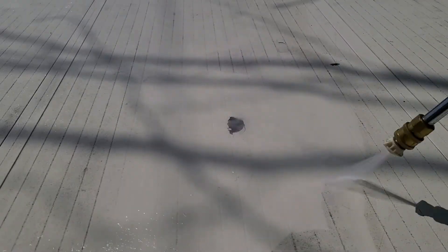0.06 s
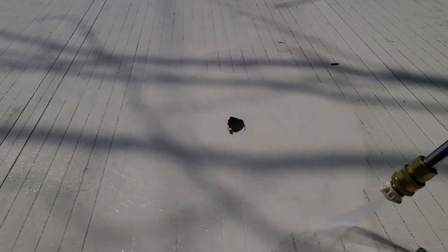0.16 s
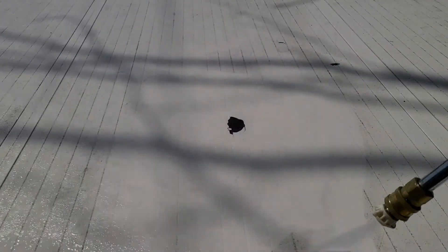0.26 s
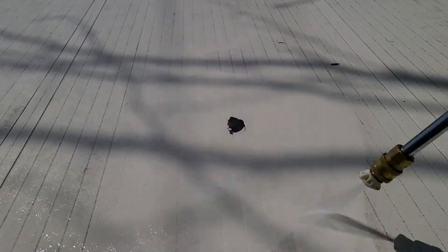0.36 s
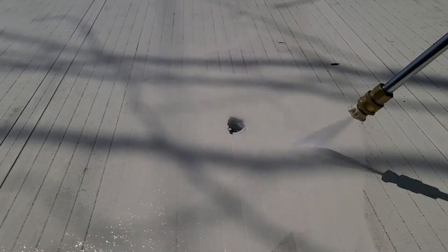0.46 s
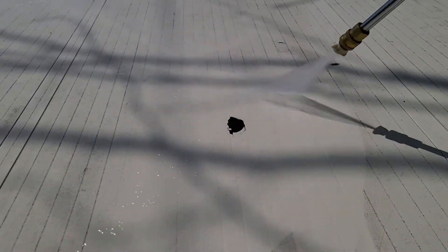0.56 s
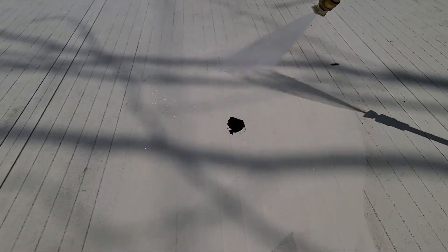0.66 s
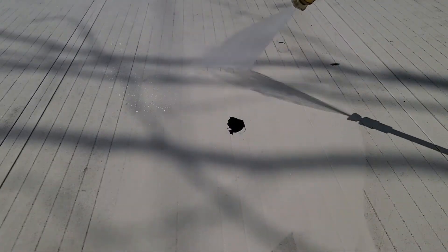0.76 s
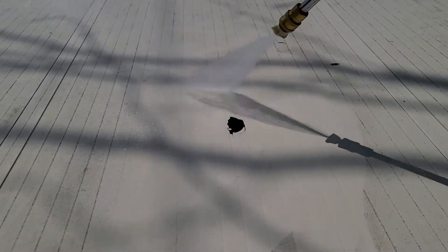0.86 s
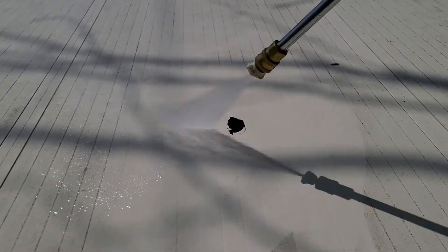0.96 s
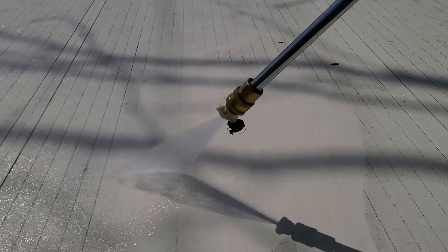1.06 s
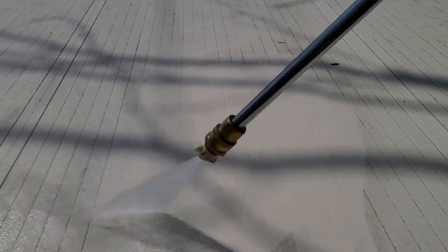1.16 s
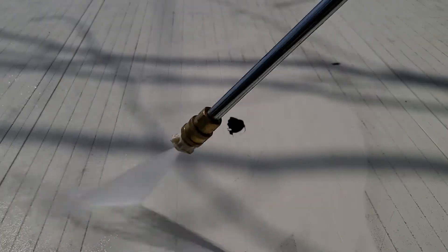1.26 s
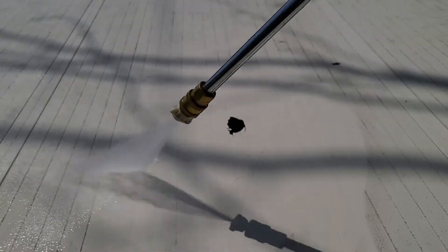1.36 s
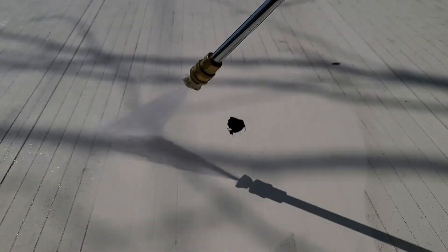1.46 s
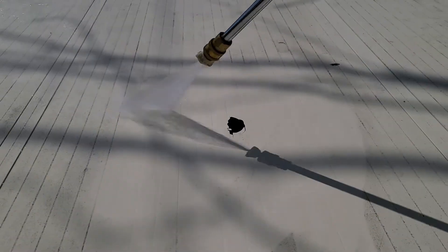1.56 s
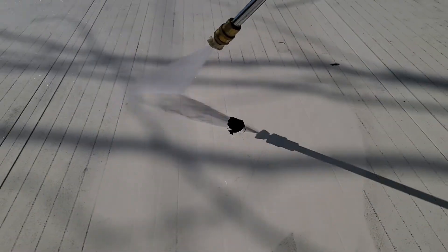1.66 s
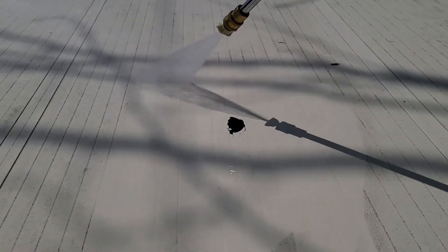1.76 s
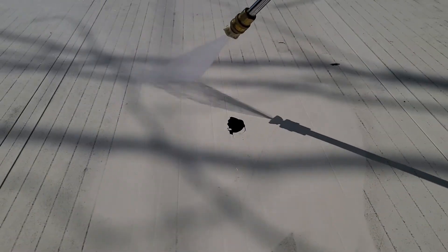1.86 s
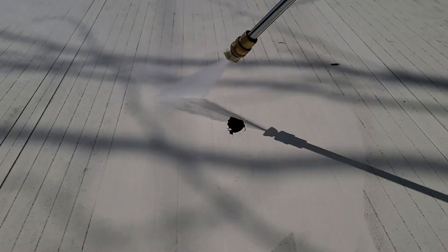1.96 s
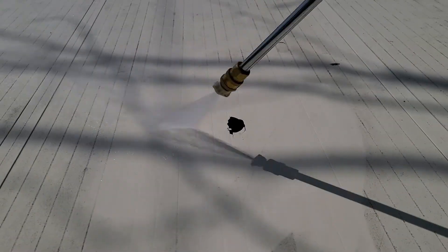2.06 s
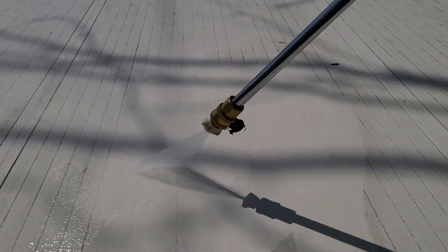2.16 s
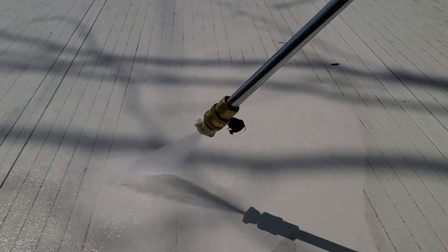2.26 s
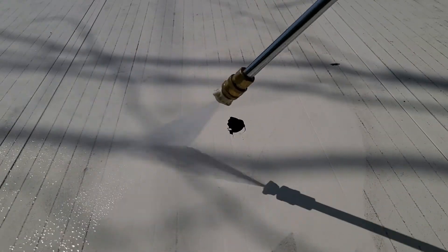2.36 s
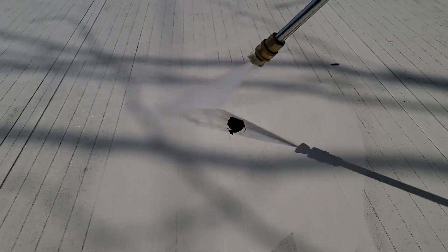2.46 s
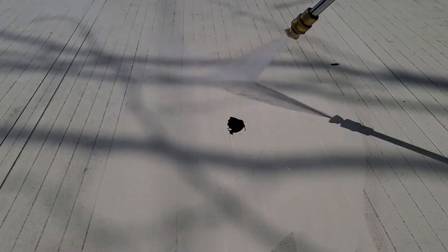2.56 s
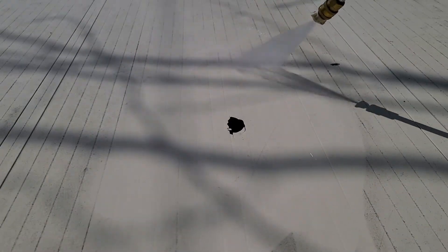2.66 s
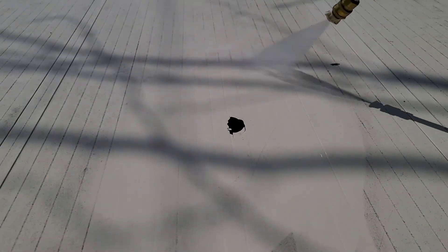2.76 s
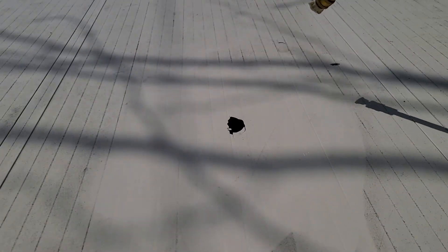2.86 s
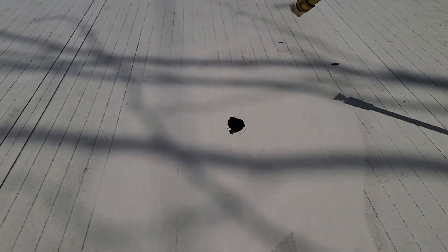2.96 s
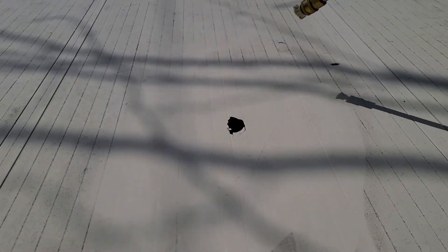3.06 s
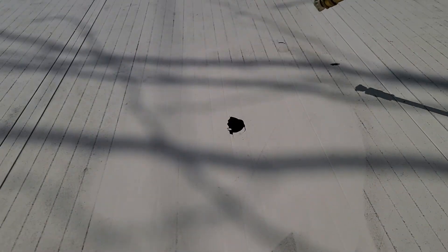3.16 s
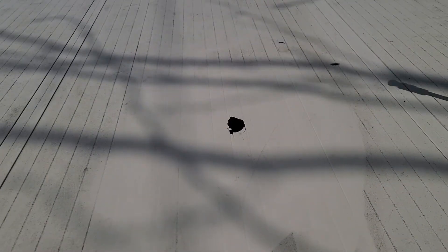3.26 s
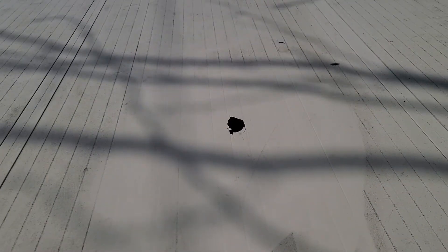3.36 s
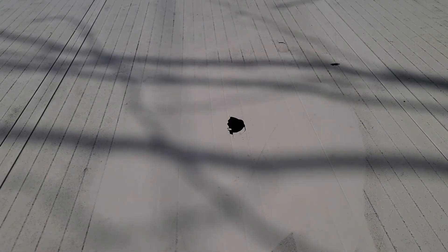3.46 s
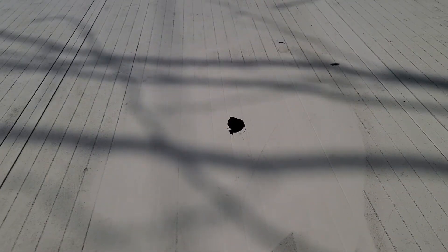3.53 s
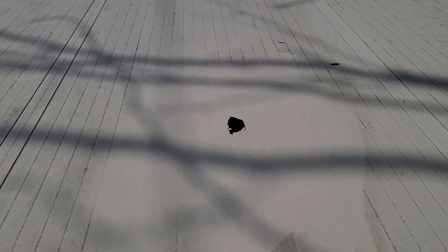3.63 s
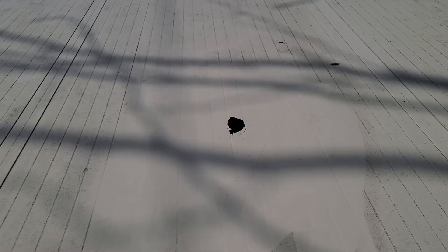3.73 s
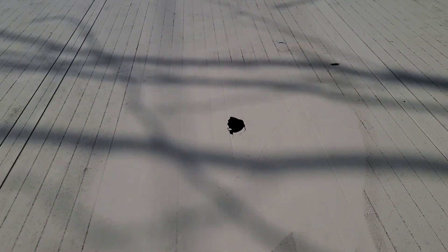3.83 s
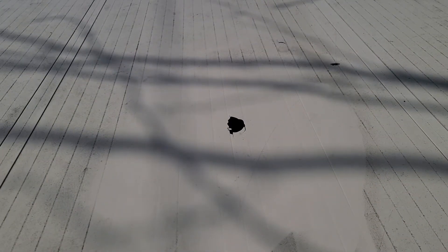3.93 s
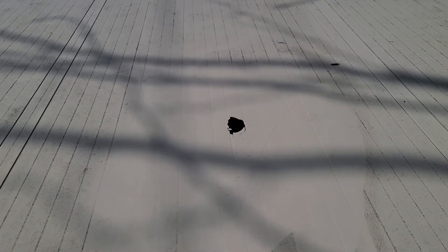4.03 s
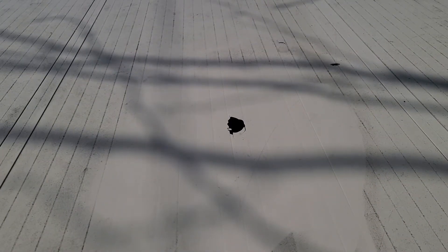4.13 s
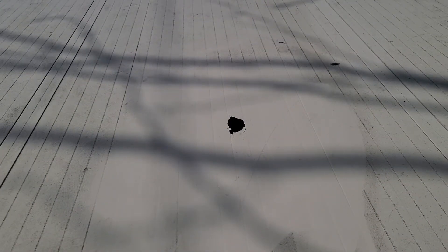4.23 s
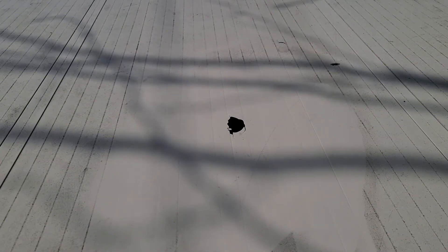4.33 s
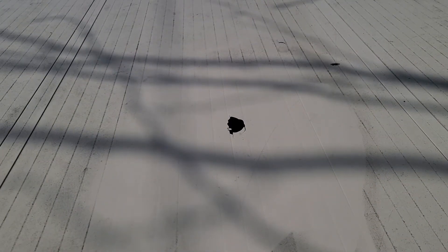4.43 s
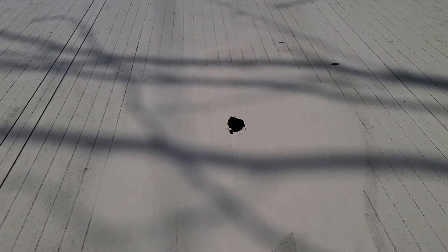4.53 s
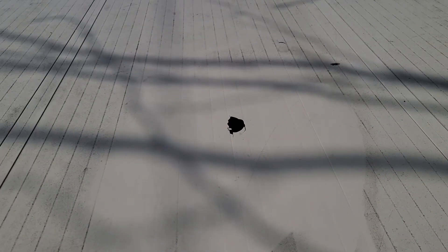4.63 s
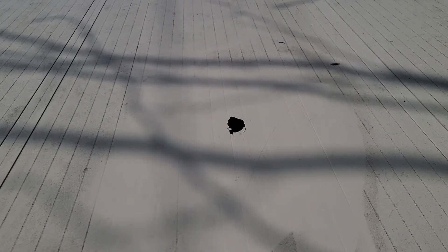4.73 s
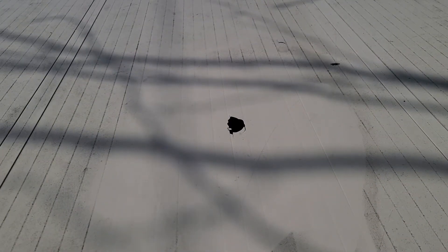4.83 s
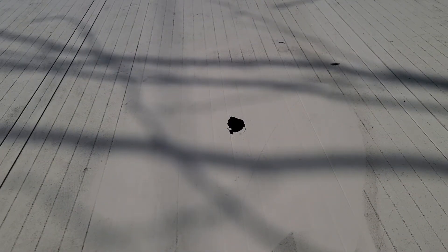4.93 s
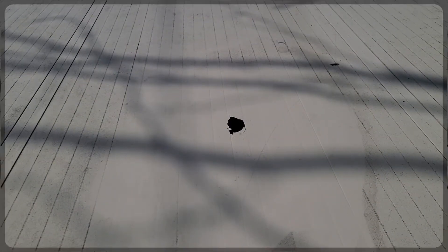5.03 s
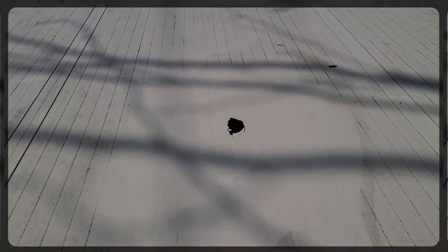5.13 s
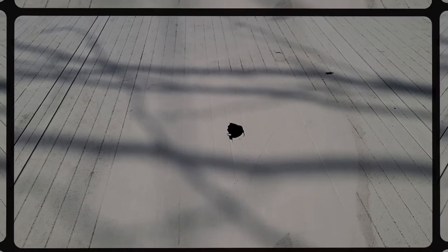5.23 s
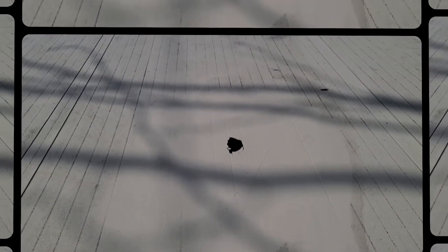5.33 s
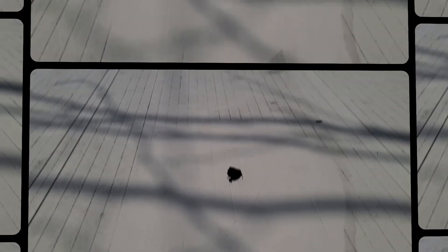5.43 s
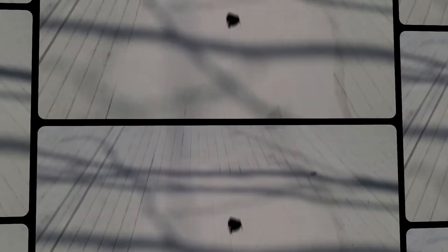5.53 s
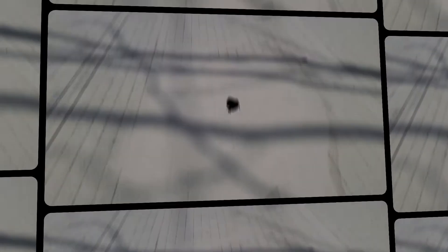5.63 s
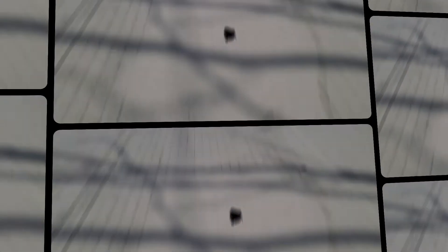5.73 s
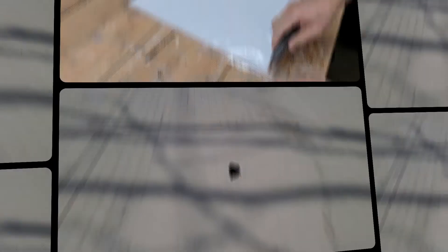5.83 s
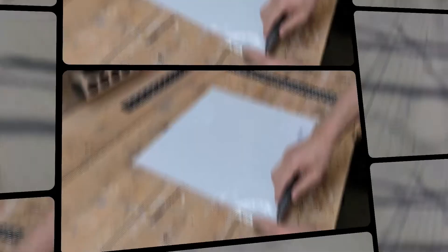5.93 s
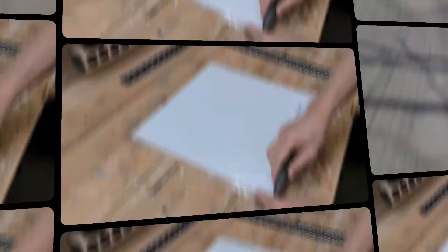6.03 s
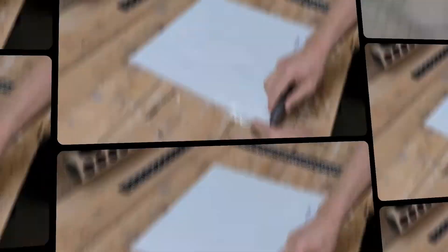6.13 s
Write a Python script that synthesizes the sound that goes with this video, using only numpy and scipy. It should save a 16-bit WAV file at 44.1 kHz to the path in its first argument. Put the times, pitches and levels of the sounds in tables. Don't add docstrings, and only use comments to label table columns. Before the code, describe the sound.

Close stereo pickup of a broad, gritty water spray drumming on roofing, moving from centre to left and back. It ends abruptly, uncovering the much quieter pump engine on the right: rapid exhaust puffs, metallic pipe ring, casing clatter and light valve ticks. The engine speeds up, hunts and steadies over a low outdoor rumble, then dims as a small contact clatter and dull thud sound nearby.

```python
import sys
import numpy as np
from scipy import signal
from scipy.fft import rfft, irfft, next_fast_len
from scipy.io import wavfile
from scipy.ndimage import uniform_filter1d

SR = 44100
rng = np.random.default_rng(int(sys.argv[2]) if len(sys.argv) > 2 else 0)


def to_wav(sig):
    pcm = np.clip(np.atleast_2d(sig), -1, 1) * 32767
    pcm = np.round(pcm).astype(np.int16)
    wavfile.write(sys.argv[1], SR, pcm.T)


def natural_amplitude(level_db):
    exponent = np.asarray(level_db, float) / 20
    return 10 ** exponent


N = 272979
PAD = next_fast_len(N + 4096)

# [f/Hz, density/dB per Hz]
SPRAY_SPECTRUM = [(150, -5), (330, -8), (700, -10), (1200, -7), (2000, -8), (3200, -4.5), (4200, -8),
                  (6300, -5.5), (7400, -17.5), (8200, -19), (10500, -12), (12500, -5.5), (13700, -6),
                  (15800, -6)]
# [t/s, nozzle nearness/dB, impact force/dB]
WAND_MOTION = [(0, 2, -2), (.14, 3, -5.5), (.25, 2, -4), (.36, 0.3, -6), (.47, -2.5, -0.5), (.66, -4.5, 1),
               (.88, -0.8, 2), (1.12, 2.5, 2.5), (1.31, 0.7, 0.6), (1.64, 0, 2), (1.82, -1, 4.5),
               (2.1, 3.5, -1.5), (2.49, -1, 2.8), (2.56, 0, 4), (2.74, -1.5, 2)]
# [f/Hz, share of nearness, share of force]
SPRAY_RESPONSE = [(400, -0.25, 0.43), (800, -0.25, 0.55), (2000, -0.037, 0.86), (5670, 0.68, 0),
                  (12500, 0.91, 0)]
# [t/s, left port lag/ms]
IMPACT_LAG = [
    (0, 0.081),
    (.5, .016),
    (1.1, -.16),
    (1.3, -0.21),
    (1.6, -.135),
    (2.1, -.12),
    (2.3, -.15),
    (2.7, -0.0031),
]
# [f/Hz, share common to both ports, left-right level/dB ahead, slope/dB per ms of lead]
JET_IMAGE = [(300, 0.84, -2, -6), (1300, 0.38, -2.5, 5), (2830, 0.75, 0.7, 5), (4000, 0.85, -2.2, 15.5),
             (5630, 0.59, 1.7, 13), (8010, 0.52, 10.5, 5), (9300, 0.046, -6, 6), (12100, 0.033, 1.5, 17)]
# [t/s, level/dB, centre f/Hz]
ROOF_DRUMMING = [
    (.037, -37.5, 368),
    (.054, -43.5, 670),
    (.058, -46.5, 1120),
    (.1, -45.5, 400),
    (.387, -47.5, 470),
    (.428, -41, 745),
    (.43, -47, 1200),
    (.49, -41, 323),
    (.528, -43, 400),
]
# [t/s, rate/cycles per s]
ENGINE_SPEED = [(0, 28.72), (2.79, 28.72), (2.85, 30.8), (2.94, 33.5), (3.1, 31.3), (3.2, 30.3),
                (3.45, 30.2), (3.62, 29.7), (3.78, 31.9), (3.92, 31.9), (4.2, 30.7), (4.4, 31.3),
                (4.62, 31.4), (4.85, 31.05), (5.45, 31.55), (5.62, 30.9), (5.85, 31.4), (6.19, 31.2)]
# [t/s, level/dB re full]
THROTTLE = [
    (0, 0),
    (2.86, 0),
    (2.97, -7),
    (3.14, -7.5),
    (3.4, -4.7),
    (3.71, -2.2),
    (3.95, -6),
    (4.34, -4.2),
    (5.1, -4.2),
]
ENGINE_CYCLE = [(-.0075, .0007, 0, -.65, 1.), (-.0033, .0009, .75, -.1, 1.), (-.0008, .0008, 1.45, 1.2, .5),
                (-.0004, .00022, .55, .15, 1.), (.00075, .0012, -.65, -1.7, 1.2),
                (.0032, .0016, .35, -.85, 1.), (.0047, .0006, .35, .45, 1.), (.0088, .0007, -.4, -.85, 1.),
                (.0105, .0015, 1.5, 1.0, .6), (.0148, .0018, .05, -1.0, 1.), (.0195, .0016, .25, -1.05, 1.),
                (.0239, .0018, .6, 0, 1.)]
STARVED_SHARE = [0, 0, .5, .5, 1, 0, 0, 0, 0, 0, -3.2, 0]
# [f/Hz, t60/s, level/dB idling, level/dB loaded]
PIPE_MODES = [(281.8, 0.27, -22.5, -29.5), (307.5, 0.33, -67, -16.5), (343.5, 0.37, -50, -29),
              (407.4, 0.14, -18, -12.5), (488, 0.1, -20, -60), (568.7, 0.15, -26.5, -18),
              (653, 0.28, -28, -35.5), (778, 0.32, -33, -25), (843, 0.16, -41, -22)]
PIPE_NULL = 250, 14, .4
# [f/Hz, density/dB per Hz]
CLATTER_SPECTRUM = [(150, -24), (300, -16), (500, -9), (900, -11), (1300, -7), (2200, -14), (3300, -13.5),
                    (4800, -20.5), (7000, -24.5), (8700, -35), (10300, -30), (12000, -23.5), (13200, -23.5),
                    (15800, -24)]
# [f/Hz, width/Hz, level/dB]
SHROUD_MODES = [(2108, 33, -13.5), (2353, 36, -17.5), (2550, 6.7, -19), (2840, 14, -27), (2900, 21, -19)]
# [f/Hz, share common to both ports]
CASING_LIKENESS = [(300, 0.99), (1000, 0.98), (3000, 0.68), (7000, 0.081), (15000, 0.098)]
# [f/Hz, left-right level/dB]
CASING_BALANCE = [(300, -3.5), (2500, -1), (4800, -3.5), (7200, 12.5), (9000, 14), (12000, -1), (15500, -1)]
# [centre t/s, length/s, tick level/dB, hiss lift/dB]
VALVE_SPELLS = [
    (2.79, 0.062, -59, -2),
    (3.3, 0.27, -67, 1.5),
    (3.7, 0.075, -65, 3),
    (4.105, 0.19, -66.5, 0.7),
    (5.02, 0.13, -60.5, 3.5),
]
# [f/Hz, width/Hz, level/dB]
TICK_MODES = [(11900, 1000, 0), (14500, 1500, -7), (9700, 700, -10), (5600, 900, -9)]
# [t/s, peak level/dB, ring f/Hz]
KNOCKS = [
    (5.802, -53, 1000),
    (5.805, -50, 1700),
    (5.809, -48, 2500),
    (5.812, -50, 1350),
    (5.817, -49, 2000),
    (6.154, -43, 610),
    (6.155, -52, 1100),
    (6.150, -46, 340),
    (6.166, -48, 260),
    (6.174, -46, 430),
]

TRIGGER_S, COLLAPSE_S = 2.751, .013
DRUM_S, DRUM_WIDTH = 0.022, 0.53
ENGINE_LAG_SAMPLES = 17
EXHAUST_DB, IDLE_BELOW_DB, OVERRUN = -39, -4.5, 1.2
PIPE_DAMPED_DB = 8
CLATTER_DB, CLATTER_FOLLOWS, AIR_DB, AIR_FOLLOWS = -56.5, 0.31, -65.5, 0.55
TICK_FLOOR_DB = -66
SETTLE_DB, SETTLE_S = -3.5, 0.88
RISE_DB, RISE_S = -3, .15
FADE_FROM_S, FADE_DB_PER_S, CASING_FADES = 5.26, -7.5, 0.72
KNOCK_CYCLES = 36
CUTOFF_HZ = 15900


def rms_one(x):
    return x / np.sqrt(np.mean(x ** 2) + 1e-20)


def in_time(rows):
    s, *columns = np.transpose(rows)
    return [np.interp(np.arange(N) / SR, s, c) for c in columns]


def at_hz(rows, hz, axis=1):
    table = np.array(rows)
    return np.interp(np.log(hz), np.log(table[:, 0]), table[:, axis])


def drift(rate_hz):
    r = np.exp(-80 * np.pi * rate_hz / SR)
    slow = signal.lfilter([1], [1, -2 * r, r * r], rng.standard_normal(N // 40 + 2002))[2000:]
    return np.interp(np.arange(N) / 40, np.arange(len(slow)), rms_one(slow))


def resonance(x, hz, width_hz):
    r = np.exp(-np.pi * width_hz / SR)
    poles = [1, -2 * r * np.cos(2 * np.pi * hz / SR), r * r]
    return signal.lfilter([(1 - r * r) / 2, 0, (r * r - 1) / 2], poles, x)


def passed(x, hz, kind, order=2):
    return signal.sosfilt(signal.butter(order, hz, kind, fs=SR, output="sos"), x)


def bands(spectrum, white):
    hz = np.arange(1, PAD // 2 + 2) * SR / PAD
    coloured = rfft(white) * natural_amplitude(at_hz(spectrum, hz)) * (hz > 150)
    coloured = coloured / np.sqrt(np.mean(np.abs(coloured) ** 2) / PAD)
    for centre_hz in 250 * 2 ** np.arange(0, 6.6, .5):
        away = np.clip(2 * np.log2(hz / centre_hz), -1, 1)
        yield centre_hz, irfft(coloured * np.cos(away * np.pi / 2) ** 2, PAD)[:, :N]


def late(x, lag_samples):
    fine = signal.resample_poly(x, 4, 1)
    return np.interp((np.arange(N) - lag_samples) * 4, np.arange(len(fine)), fine)


def jet():
    (near_db, force_db), (lag_ms,) = in_time(WAND_MOTION), in_time(IMPACT_LAG)
    white = rng.standard_normal((3, PAD))
    drop_sizes = natural_amplitude(3.5 * rng.exponential(1, PAD) - 16.0) * rng.choice([-1, 1], PAD)
    white[0] += (rng.random(PAD) < 900 / SR) * drop_sizes
    direct, diffuse = np.zeros((2, N)), np.zeros((2, N))
    flutter_db = .5 * drift(8.6) + .5 * drift(90)
    for hz, (common, *own) in bands(SPRAY_SPECTRUM, white):
        change_db = at_hz(SPRAY_RESPONSE, hz) * near_db + at_hz(SPRAY_RESPONSE, hz, axis=2) * force_db
        pan_db = at_hz(JET_IMAGE, hz, axis=2) - at_hz(JET_IMAGE, hz, axis=3) * lag_ms
        band_db = change_db + flutter_db + 0.71 * drift(15.0)
        gain = natural_amplitude(band_db + pan_db / 2 * np.array([[1], [-1]]))
        share = np.clip(at_hz(JET_IMAGE, hz), 0, 1)
        direct += gain * np.sqrt(share) * common
        diffuse += gain * np.sqrt(1 - share) * np.array(own)
    direct[0] = late(direct[0], lag_ms * SR / 1000)
    after_s = np.maximum(np.arange(N) / SR - TRIGGER_S, 0)
    spray = (direct + diffuse) * natural_amplitude(-60 * after_s / COLLAPSE_S)
    echo = passed(diffuse, 5000, "low") * natural_amplitude(-14 - 60 * after_s / .5) * (after_s > 0)
    return natural_amplitude(-32.5) * (spray + echo)


def drumming():
    out, span = np.zeros((2, N)), SR * 7 // 10
    t = np.arange(span) / SR
    for s, db, hz in ROOF_DRUMMING:
        common, left, right = rng.standard_normal((3, span))
        noise = common + 0.54 * np.array([left, right])
        for _ in range(2):
            noise = resonance(noise, hz, DRUM_WIDTH * hz)
        out[:, :span] += natural_amplitude(db) * np.exp(-.5 * ((t - s) / DRUM_S) ** 2) * rms_one(noise)
    return out


def strokes(per_s):
    turns = np.cumsum(per_s * (1 + .001 * drift(10))) / SR + .3
    return np.r_[-round(.3 * SR / per_s[0]), np.flatnonzero(np.diff(np.floor(turns)) > 0)]


def train(at, sizes, delay_s=0.):
    out = np.zeros(N + SR)
    out[at + round(delay_s * SR)] = sizes
    return out[:N]


def exhaust(at, level_db, load):
    chance = rng.standard_normal((len(at), len(ENGINE_CYCLE) + 1))
    t = np.arange(-300, 301) / SR
    wave, load = np.zeros(N), load[np.maximum(at, 0)]
    pull, shut = np.maximum(load, 0), np.minimum(load, 0)
    for k, (s, width_s, idling, loaded, spread_db) in enumerate(ENGINE_CYCLE):
        starved = shut * idling * STARVED_SHARE[k]
        sizes = (idling + (loaded - idling) * pull + starved) * natural_amplitude(spread_db * chance[:, k])
        wave += signal.fftconvolve(train(at, sizes, s), np.exp(-.5 * (t / width_s) ** 2), "same")
    for hz, t60_s, idling_db, loaded_db in PIPE_MODES:
        r, w = natural_amplitude(-60 / (t60_s * SR)), 2 * np.pi * hz / SR
        blow_db = idling_db + (loaded_db - idling_db) * pull + PIPE_DAMPED_DB * shut + chance[:, -1]
        blows = passed(train(at, natural_amplitude(blow_db), -.002) + 1e-18, 1660, "low")
        wave += signal.lfilter([0, np.sin(w)], [1, -2 * r * np.cos(w), r * r], blows)
    null_hz, null_width_hz, null_share = PIPE_NULL
    wave = wave - null_share * resonance(wave, null_hz, null_width_hz)
    wave = passed(wave - uniform_filter1d(wave, 4200), 8, "high", order=1)
    wave = natural_amplitude(level_db - 1.5) * wave / np.sqrt(uniform_filter1d(wave ** 2, 8000))
    return np.array([late(wave, ENGINE_LAG_SAMPLES) * natural_amplitude(0.5), wave * natural_amplitude(2.46)])


def clatter(at, level_db, hiss_db):
    blows = train(at, 1.0, 0.0083) + train(at, 0.16, 0.02)
    swell = signal.lfilter([1], [1, -np.exp(-1 / (0.0062 * SR))], blows)
    direct, diffuse = np.zeros((2, N)), np.zeros((2, N))
    together = drift(2.8)
    for hz, (common, *own) in bands(CLATTER_SPECTRUM, rng.standard_normal((3, PAD))):
        share = np.clip(at_hz(CASING_LIKENESS, hz), 0, 1)
        airy = np.clip(np.log2(hz / 3500), 0, 1)
        db = level_db + airy * (hiss_db - level_db + 5.0) + .5 * together + 1.0 * drift(30)
        gain = natural_amplitude(db + 8 + at_hz(CASING_BALANCE, hz) / 2 * np.array([[1], [-1]]))
        direct += gain * np.sqrt(share) * common
        diffuse += gain * np.sqrt(1 - share) * np.array(own)
    white = rng.standard_normal(N)
    for hz, width_hz, db in SHROUD_MODES:
        ring = rms_one(resonance(white, hz, width_hz))
        direct += natural_amplitude(level_db + 8.5 + db + 0.62 * drift(13.0)) * ring
    direct[0] = late(direct[0], ENGINE_LAG_SAMPLES)
    return direct * (0.79 + 0.85 * swell) + diffuse


def valve_ticks(at, level_db):
    chance = rng.standard_normal((len(at), 4))
    hits = train(at, natural_amplitude(1.5 * chance[:, 0]), .0088)
    hits += train(at, natural_amplitude(3 * chance[:, 1] - 7), .0135)
    hits += train(at, natural_amplitude(3 * chance[:, 2] - 5), .018)
    hits += train(at, natural_amplitude(3 * chance[:, 3] - 8), .026)
    decay = signal.lfilter([1], [1, -np.exp(-1 / (.002 * SR))], hits + 1e-18)
    bursts = decay * rng.standard_normal((4, N))
    tick = np.zeros(N)
    for burst, (hz, width_hz, db) in zip(bursts, TICK_MODES):
        tick += natural_amplitude(db) * resonance(resonance(burst, hz, width_hz), hz, width_hz)
    tick = natural_amplitude(level_db) * rms_one(tick)
    return np.array([late(tick, ENGINE_LAG_SAMPLES) * natural_amplitude(-13.0), tick])


def spells():
    t = np.arange(N) / SR
    tick, lift_db = natural_amplitude(TICK_FLOOR_DB), 0
    for s, length_s, tick_db, hiss_db in VALVE_SPELLS:
        bell = np.exp(-.5 * ((t - s) / length_s) ** 2)
        tick = tick + natural_amplitude(tick_db) * bell
        lift_db = lift_db + hiss_db * bell
    return 20 * np.log10(tick), lift_db


def knocks():
    out = np.zeros(N)
    for s, db, hz in KNOCKS:
        start = round(s * SR)
        t = np.arange(N - start) / SR
        out[start:] += natural_amplitude(db - 60 * t * hz / KNOCK_CYCLES) * np.sin(2 * np.pi * hz * t)
    return out


def rumble(exhaust_db):
    white = rng.standard_normal((2, N))
    wide = natural_amplitude(exhaust_db - 21) * rms_one(passed(white, [60, 260], "band"))
    return wide + natural_amplitude(exhaust_db - 41) * rms_one(passed(white[0], [18, 45], "band"))


def scene():
    (per_s,), (throttle_db,), t = in_time(ENGINE_SPEED), in_time(THROTTLE), np.arange(N) / SR
    opening = np.clip(1 - throttle_db / IDLE_BELOW_DB, -1, 1)
    load = opening ** 2 * np.where(opening > 0, 1, -OVERRUN)
    fade_db = FADE_DB_PER_S * np.maximum(t - FADE_FROM_S, 0) + RISE_DB * np.maximum(1 - t / RISE_S, 0)
    exhaust_db = EXHAUST_DB + throttle_db + fade_db
    tick_db, lift_db = spells()
    settling_db = SETTLE_DB * np.exp(-np.maximum(t - TRIGGER_S, 0) / SETTLE_S)
    clatter_db = CLATTER_DB + settling_db + CLATTER_FOLLOWS * throttle_db + CASING_FADES * fade_db
    hiss_db = AIR_DB + AIR_FOLLOWS * throttle_db + lift_db + CASING_FADES * fade_db
    at = strokes(per_s)
    engine = exhaust(at, exhaust_db, load)
    engine += clatter(at, clatter_db, hiss_db)
    engine += valve_ticks(at, tick_db + fade_db)
    return jet() + drumming() + engine + knocks() + rumble(exhaust_db)


def top_cut(x):
    return signal.sosfilt(signal.butter(12, 15930, fs=SR, output="sos"), x)


def record(dry):
    steep = signal.cheby2(16, 70, CUTOFF_HZ + 400, fs=SR, output="sos")
    mix = signal.sosfilt(steep, dry)
    return top_cut(mix)


dry = scene()
out = record(dry)
to_wav(out)
```